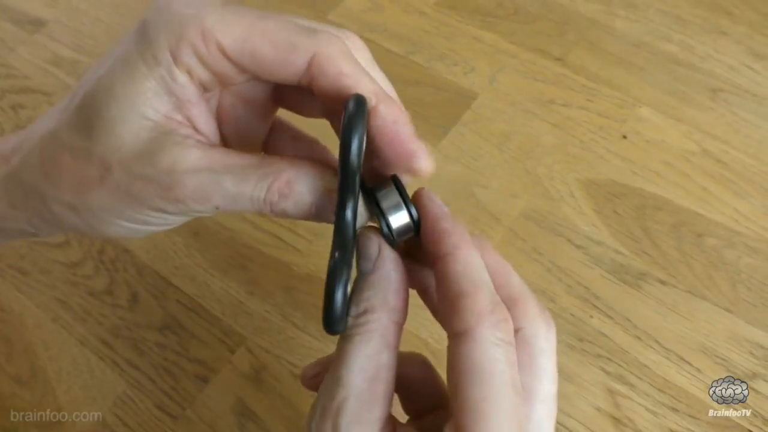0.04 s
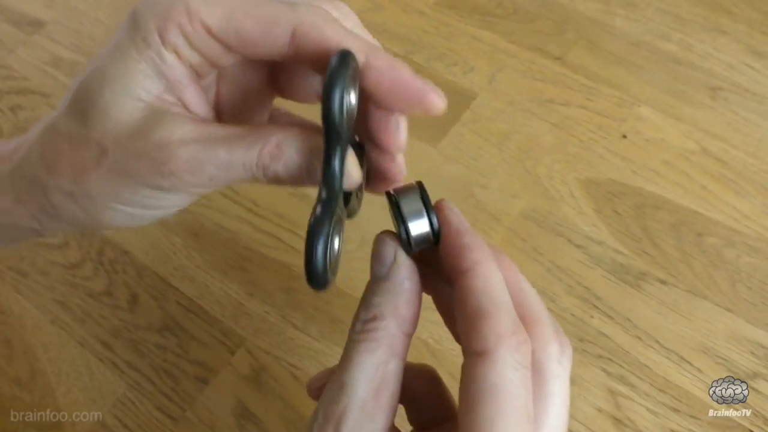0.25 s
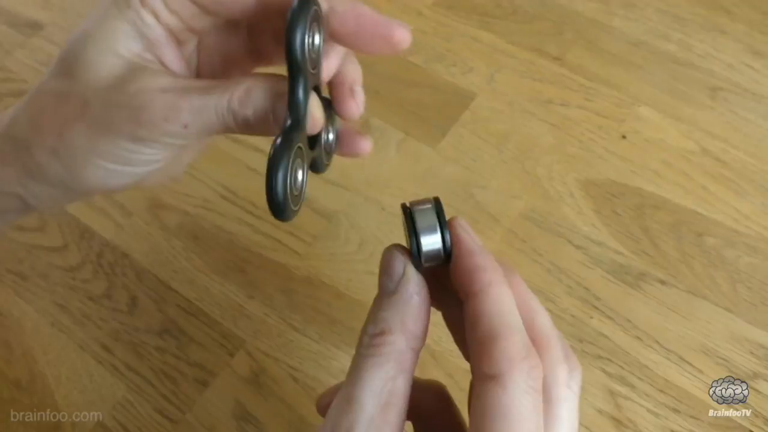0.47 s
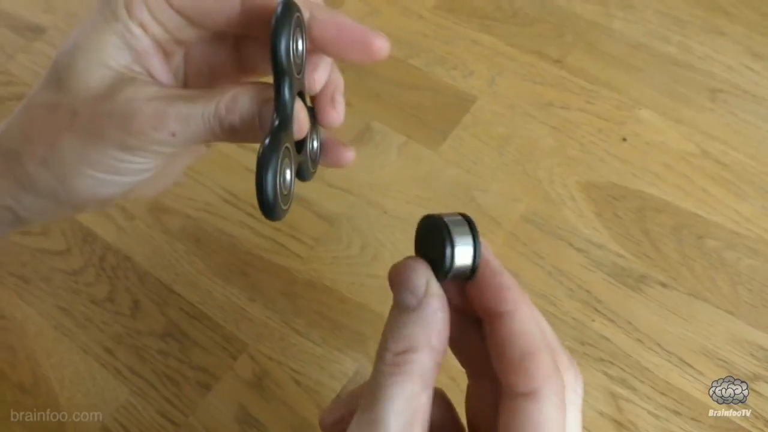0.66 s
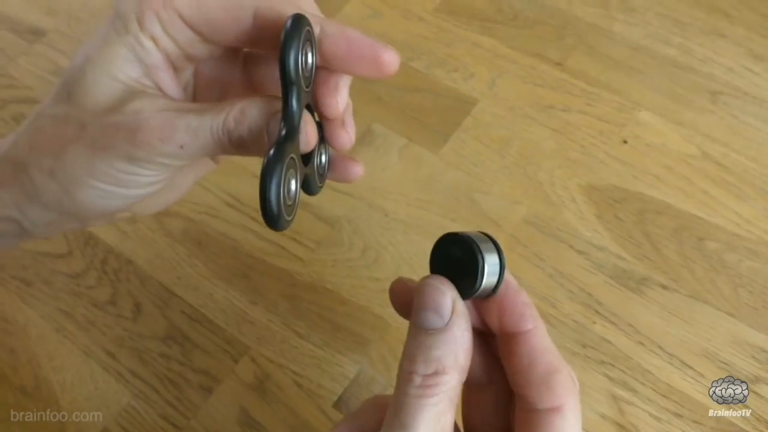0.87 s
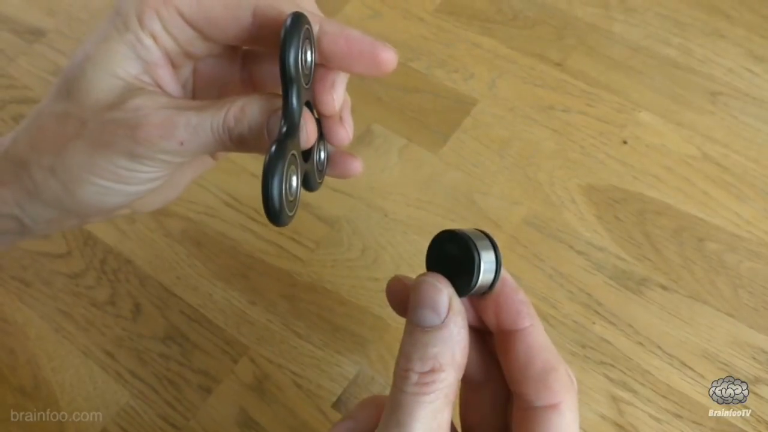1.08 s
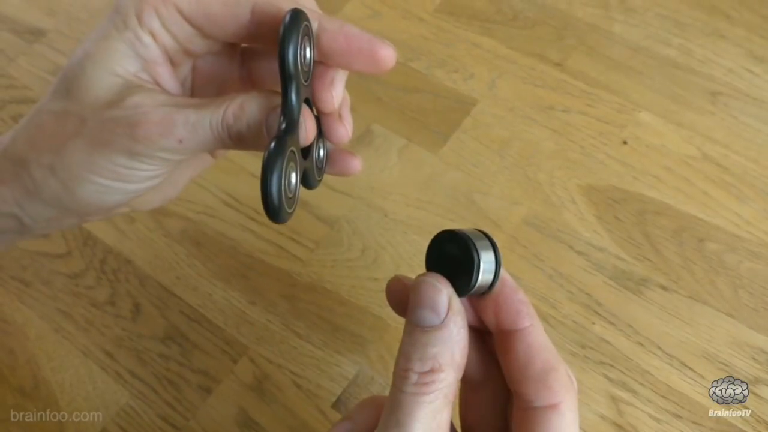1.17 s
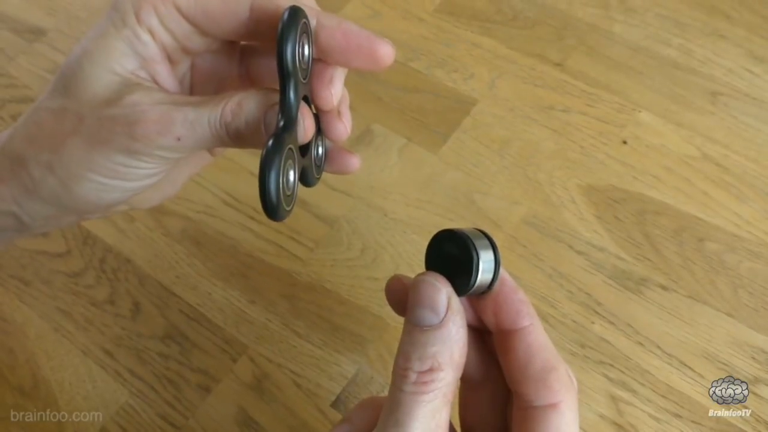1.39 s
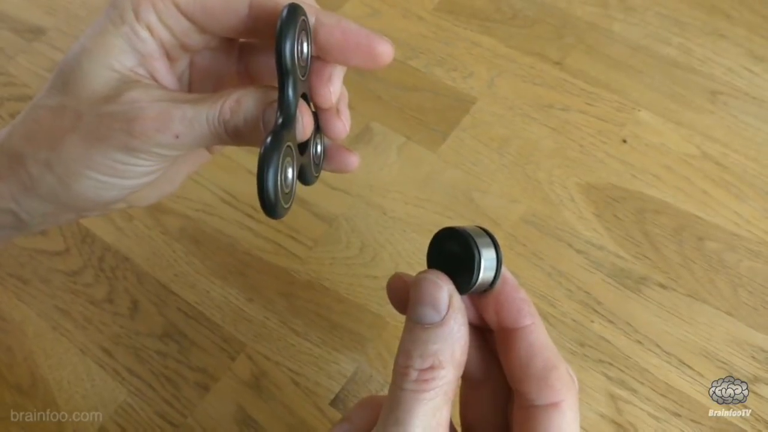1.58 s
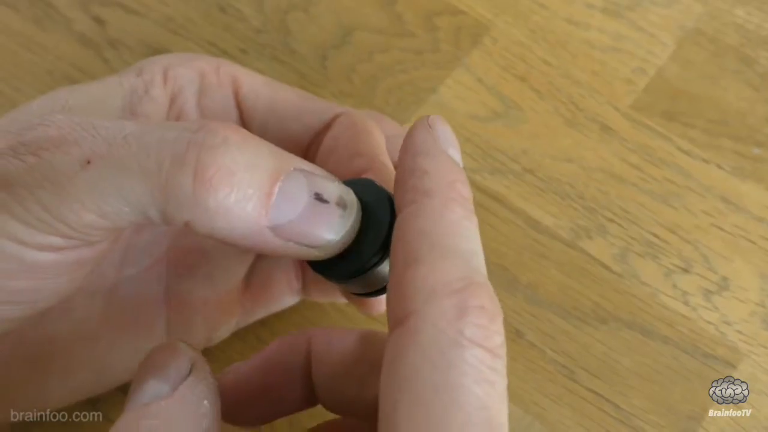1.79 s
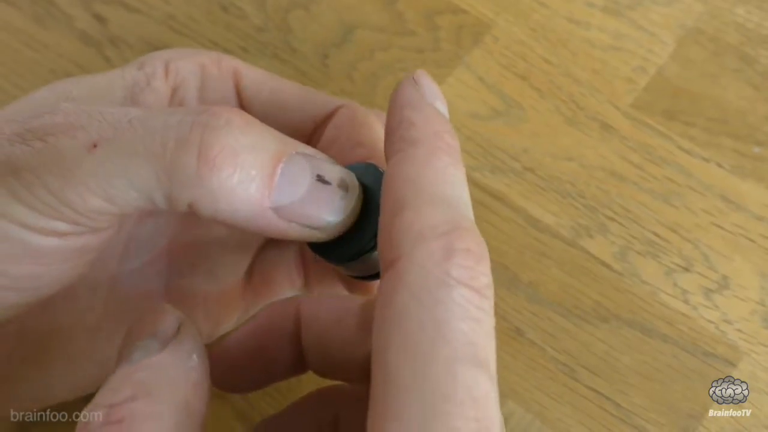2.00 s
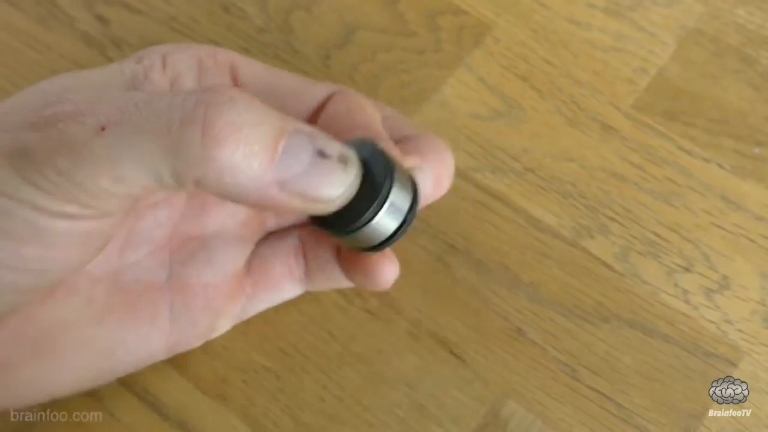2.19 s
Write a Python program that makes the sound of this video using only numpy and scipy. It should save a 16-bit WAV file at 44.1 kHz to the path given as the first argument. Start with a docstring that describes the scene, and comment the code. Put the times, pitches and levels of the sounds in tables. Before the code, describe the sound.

A small metal bearing whirrs close up, fine and bright with a slight rasp. At about 0.4 seconds it snaps free of a plastic spinner with a sharp click, whirrs a little fuller, and dies away around 1 second. A soft, low thump follows just after, then dry ticks near 1.4 seconds. Fingers rub with a faint hollow rustle throughout, over a quiet room's low hum and hiss.

```python
"""A small metal bearing whirrs between fingers, close up, snaps free of a plastic spinner and stops.
Its balls patter over the races so densely that they blur into a bright whirr with a coarser rasp.
The hands shift with a hollow rustle, skin slides on the caps and sometimes sings, and there are
a few dry ticks, faint bumps and one soft thump. Under it lie a low hum and the hiss of a quiet room."""
import sys
import numpy as np
from scipy import signal
from scipy.fft import rfft, irfft
from scipy.io import wavfile
from scipy.ndimage import uniform_filter1d

SR = 44100
rng = np.random.default_rng(int(sys.argv[2]) if len(sys.argv) > 2 else 0)


def int16_out(signal):
    """Quantize to a 16-bit WAV file."""
    q = np.round(np.clip(np.atleast_2d(signal).T, -1, 1) * 32767)
    wavfile.write(sys.argv[1], SR, q.astype(np.int16))


N = 99225
T = np.arange(N) / SR
SNAP_S = .4387  # the bearing comes free


def undb(db):
    """Decibels to gain."""
    return 10 ** (np.asarray(db) / 20)


def unit(x):
    """Scale to rms 1."""
    return x / np.sqrt(np.mean(x ** 2))


def curve(rows):
    """An envelope of straight lines through (t/s, value) points."""
    return np.interp(T, *np.array(rows).T)


def noise():
    """White noise."""
    return rng.standard_normal(N)


def colour(x, points):
    """EQ through (f/Hz, level/dB) points, falling steeply beyond the ends; rms 1."""
    log_f = np.log(np.fft.rfftfreq(N, 1 / SR) + 1)
    hz, db = np.array(points).T
    outside = np.abs(log_f - np.clip(log_f, np.log(hz[0]), np.log(hz[-1])))
    gain = undb(np.interp(log_f, np.log(hz), db) - 60 * outside)
    return unit(irfft(rfft(x) * gain, N))


def band(x, hz, width_hz):
    """Two equal resonant band-passes in series; rms 1."""
    f = np.fft.rfftfreq(N, 1 / SR) + 1
    return unit(irfft(rfft(x) / (1 + 1j * (f * f - hz * hz) / (f * width_hz * 1.52)) ** 2, N))


def flat_band(x, hz, width_hz):
    """A flat-topped band-pass with firm edges; rms 1."""
    f = np.fft.rfftfreq(N, 1 / SR)
    return unit(irfft(rfft(x) / np.sqrt(1 + (2 * (f - hz) / width_hz) ** 6), N))


def drift(rate_hz):
    """A smooth random modulator; rms 1."""
    span = int(SR / rate_hz)
    return unit(uniform_filter1d(uniform_filter1d(noise(), span, mode="wrap"), span, mode="wrap"))


def grains(per_s, spread_db):
    """Dense tiny impacts of uneven size."""
    impacts = noise() * (rng.random(N) < per_s / SR)
    return impacts * undb(spread_db * np.minimum(rng.exponential(size=N), 5))


def ping(start, hz, decay_s):
    """A struck, damped mode."""
    age = np.maximum(T - start, 0)
    return np.sin(2 * np.pi * hz * age) * np.exp(-age / decay_s)


def swell(middle, length):
    """A bell-shaped fade in and out."""
    return np.exp(-2 * ((T - middle) / length) ** 2)


def tone(hz, wander):
    """A sine of rms 1 whose pitch wanders by a fraction of itself."""
    pitch = hz * (1 + wander * drift(27.6))
    return np.sqrt(2) * np.sin(2 * np.pi * np.cumsum(pitch) / SR)


def grip_ripple(x, depth_db=2.2, width_hz=130, life_s=.07, size=1024):
    """Random narrow peaks and dips that change with the grip."""
    frames = dict(nperseg=size, noverlap=size * 3 // 4)
    spectra = signal.stft(x, **frames)[2]
    ripple = uniform_filter1d(rng.standard_normal(spectra.shape), int(width_hz * size / SR), axis=0)
    ripple = unit(uniform_filter1d(ripple, int(life_s * SR * 4 / size), axis=1))
    return signal.istft(spectra * unit(undb(depth_db * ripple)), **frames)[1][:N]


def bearing():
    """Balls patter over the races: a fine, resonant whirr, fuller once free, and a coarser rasp."""
    # EQ of the whirr pinched against the spinner, of the free whirr and of the rasp: f/Hz, level/dB
    pinched_eq = [(1500, -34), (3000, -11), (4000, -22), (4900, -11), (5500, -0.5), (6500, -4), (8000, 1),
                  (10500, 2), (13500, -5), (15500, -3.5), (17000, -19)]
    free_eq = [(900, -34), (2000, -17), (3600, -10), (4600, -6.5), (5600, 0.5), (6400, -3), (7500, 0.5),
               (10000, -0.5), (13000, -1), (15500, -2), (17000, -0.5)]
    rasp_eq = [(530, -40), (900, -14), (1180, -4), (1450, -9), (1760, -3.5), (2180, -9.5), (2350, -15),
               (2610, -7.5), (3290, -22), (4200, -13), (5460, -50), (9240, -120)]
    # resonances of the races, which come and go with the grip: f/Hz, width/Hz, level/dB
    races = [(2560, 60, -29), (9120, 140, -23), (11530, 60, -26), (12376, 60, -26), (13123, 60, -24),
             (13517, 60, -25), (14001, 60, -25), (16880, 200, -17)]
    # sheen and thin ring of the outer race, relative to the whirr: t/s, level/dB
    sheen_env = [(0, 0.5), (.4, -12.5), (.6, -8), (.73, -3), (.82, 0.5), (.88, 0), (.96, -0.5), (1.05, -14)]
    ring_env = [(0, -24), (.17, -22), (.28, -12), (.4, -21), (.7, -17), (.81, -13), (.91, -10), (1.0, -37)]
    # envelopes of the whirr (two parts: pinched, free) and of the rasp: t/s, level/dB
    whirr_env = [
        [(0.0, -55.5), (0.136, -51), (0.142, -48.5), (0.274, -50), (0.284, -49.5), (0.31, -50), (0.416, -47.5),
         (0.425, -44)],
        [(0.455, -45), (0.461, -42.5), (0.505, -46.5), (0.733, -44.5), (0.955, -45.5), (1.031, -59.5),
         (1.12, -65)],
    ]
    rasp_env = [(0, -80), (.2, -62), (.34, -65.5), (.40, -56.5), (.5, -50.5), (.57, -57), (.62, -54.5),
                (.66, -55.5), (.71, -50), (.8, -56.5), (.88, -59), (.96, -85), (1.1, -88)]
    patter = lambda: grains(per_s=14000, spread_db=-1)
    whirr = np.where(T < SNAP_S, colour(patter(), pinched_eq), colour(patter(), free_eq))
    whirr += undb(curve(sheen_env)) * band(patter(), hz=12600, width_hz=3000)
    for hz, width, db in races:
        whirr += undb(db + 3 * drift(8.8)) * band(patter(), hz, width)
    whirr += undb(curve(ring_env)) * band(patter(), hz=4470, width_hz=230)
    stop_s = whirr_env[1][-1][0]
    fade_out = np.clip((stop_s - T) / 0.11, 0, 1)
    whirr *= undb(curve(whirr_env[0] + whirr_env[1])) * fade_out
    rasp = colour(grains(per_s=3000, spread_db=1.9), rasp_eq) * undb(curve(rasp_env))
    flutter_db = 1.1
    return grip_ripple(whirr + rasp) * undb(flutter_db * drift(30))


def hand_rustle():
    """Fingers shift: friction grains in a hollow, gliding resonance, with a weaker one above it."""
    # centre of the hollow resonance: t/s, f/Hz
    glide = [(0, 596.7), (.2, 642.4), (.5, 671.3), (.88, 611.8), (1.05, 680), (1.35, 668.7), (1.6, 615),
             (1.7, 635.7), (1.82, 700), (2.0, 670), (2.2, 700)]
    # EQ of the broad rustle around it: f/Hz, level/dB
    skirt_eq = [(150, -14.5), (260, 8.5), (430, -1.5), (560, 5), (760, 4), (930, -6), (1200, -14.5),
                (1600, -11), (2400, -40), (5000, -99)]
    # envelopes of the hollow rustle (two parts in a row) and of the upper resonance: t/s, level/dB
    hollow_env = [
        [(0.0, -66), (0.066, -49.5), (0.172, -57.5), (0.21, -52.5), (0.256, -74), (0.286, -50), (0.318, -74),
         (0.344, -56.5), (0.4, -58.5), (0.438, -44.5), (0.484, -63), (0.812, -53.5), (0.83, -48),
         (0.924, -45.5), (0.95, -50), (1.05, -52.5)],
        [(1.06, -57), (1.092, -46), (1.42, -51.5), (1.46, -63), (1.52, -71), (1.54, -57), (1.576, -69),
         (1.626, -47.5), (1.65, -61), (1.682, -51), (1.698, -49.5), (1.998, -50), (2.03, -83), (2.054, -59),
         (2.116, -54.5), (2.25, -67)],
    ]
    upper_env = [(0, -54.5), (.07, -61.5), (.17, -56), (.35, -58), (.55, -71.5), (.8, -55), (1, -60),
                 (1.4, -71), (2.25, -68.5)]
    centre = curve(glide)
    core = band(grains(per_s=2500, spread_db=1.36), centre.mean(), width_hz=55)
    shift = np.exp(2j * np.pi * np.cumsum(centre - centre.mean()) / SR)
    core = (signal.hilbert(core) * shift).real  # frequency-shifted along the glide
    skirt = colour(grains(per_s=1500, spread_db=2.34), skirt_eq)
    hollow = (undb(-3) * core + undb(-4) * skirt) * undb(curve(hollow_env[0] + hollow_env[1]))
    upper = band(noise(), hz=1150.4, width_hz=113) * undb(curve(upper_env))
    return hollow + upper


def room():
    """The quiet bed: a wavering two-note hum, steady mains lines, room tone and hiss."""
    # envelopes of the low and high hum notes and of the hiss: t/s, level/dB
    low_env = [(0, -72), (.33, -63), (.42, -68), (.47, -52), (.52, -46), (.575, -59), (.62, -52),
               (.73, -70), (.83, -64), (.91, -45), (.99, -60), (1.07, -70), (1.3, -66), (2.25, -70)]
    high_env = [(0, -72.5), (.45, -66.5), (.53, -56), (.6, -63), (.66, -50), (.7, -58), (.75, -53),
                (.82, -60), (.9, -56.5), (.99, -50.5), (1.06, -73), (1.25, -57), (1.38, -67.5), (1.5, -56),
                (1.7, -64), (2, -62), (2.25, -83)]
    hiss_env = [(0, -62), (1.1, -61.5), (1.5, -63), (1.75, -60.5), (2, -59), (2.25, -58.5)]
    # mains lines: f/Hz, level/dB
    mains_lines = [(120, -82), (600, -65)]
    # EQ of the room tone and of the hiss: f/Hz, level/dB
    room_eq = [(40, -9), (80, -6.5), (200, 0), (450, -6.5), (650, -4.5), (950, -1.5), (1500, -4),
               (2500, -10), (4000, -70)]
    hiss_eq = [(1470, -37), (2500, -4), (3060, -2), (3260, -5), (3640, -4.5), (4110, -7), (4310, -0.5),
               (5710, -5), (6650, -3.5), (8530, -4.5), (11700, -1), (15400, -6.5), (17000, -4.5)]
    waver = lambda hz: tone(hz, wander=.04) + undb(-8) * band(noise(), hz, hz / 3)
    hum = waver(hz=116) * undb(curve(low_env)) + waver(hz=199.3) * undb(curve(high_env) + 1.5)
    for hz, db in mains_lines:
        hum += undb(db) * np.sqrt(2) * np.sin(2 * np.pi * (hz * T + rng.random()))
    room_tone = undb(-63.5) * colour(noise(), room_eq)
    hiss = undb(curve(hiss_env)) * colour(noise(), hiss_eq)
    return hum + room_tone + hiss


def hand_bumps():
    """Soft knocks of the hands, each a few low cycles with a dull rumble; one stands out as a thump."""
    # knocks: t/s, level/dB, f/Hz, hold/s
    knocks = [(0.049, -51.5, 81, 0.026), (.085, -52, 171, .005), (0.134, -57, 80, 0.034),
              (0.277, -57.5, 97, 0.027), (0.366, -64, 75, 0.023), (.44, -48.5, 72, 0.015),
              (.495, -53, 83, 0.012), (0.59, -59, 82, 0.035), (0.874, -57, 86, 0.085),
              (1.141, -25.5, 64, 0.033), (1.223, -48, 80, 0.0084), (1.791, -62.5, 82, 0.037),
              (1.938, -53.5, 71.4, 0.029)]
    # EQ of the rumble: f/Hz, level/dB
    rumble_eq = [(20, 20), (40, -9), (110, 8), (170, 2), (300, -12.5), (700, -18), (2000, -45)]
    attack_s, release_s = 0.001, 0.019
    out = np.zeros(N)
    for start, db, hz, hold in knocks:
        age = np.maximum(T - start, 0)
        envelope = np.minimum(age / attack_s, 1) * np.exp(-np.maximum(age - hold, 0) / release_s)
        rumble = undb(-10) * colour(noise(), rumble_eq)
        out += undb(db) * envelope * (rumble - np.sin(2 * np.pi * hz * age))
    return out


def skin_rubs():
    """Skin slides on the caps in swells of friction grains; at times the hollow resonance sings."""
    # slides: middle t/s, length/s, level/dB, centre f/Hz, width/Hz
    slides = [(0.296, 0.059, -57, 442, 695), (0.396, 0.074, -57, 7150, 5470),
              (0.624, 0.023, -54.5, 455, 700), (0.612, 0.028, -50.5, 5000, 7000),
              (0.7, 0.052, -51, 5000, 6960), (.66, .07, -51, 16000, 2200), (0.747, 0.11, -56, 376, 300),
              (1.149, 0.027, -44.5, 990, 1260), (1.157, 0.027, -59.5, 2340, 1310),
              (1.17, .035, -47.5, 238, 179), (1.207, 0.17, -55, 1140, 910),
              (1.262, 0.044, -54.5, 1800, 347), (1.277, 0.09, -62.5, 2640, 600),
              (1.317, 0.068, -55, 7200, 4400), (1.359, 0.02, -49.5, 11300, 4500),
              (1.375, 0.069, -55, 6800, 5200), (1.554, 0.023, -51.5, 490, 490),
              (1.607, 0.23, -58, 393, 380), (1.737, 0.055, -59.5, 1480, 296),
              (1.856, 0.1, -58.5, 1530, 550), (1.857, 0.019, -51, 304, 196), (1.863, 0.15, -65, 5100, 4540),
              (1.942, 0.06, -55, 230, 178), (1.96, 0.04, -60.5, 8750, 1700), (2.058, 0.1, -55.5, 1465, 520),
              (2.08, .06, -64, 2680, 700), (2.139, 0.027, -58.5, 8600, 1700)]
    # sung notes: middle t/s, length/s, level/dB, f/Hz
    notes = [(0.078, 0.034, -51.5, 602), (0.356, 0.068, -55, 654), (0.56, 0.19, -57.5, 662),
             (0.867, 0.084, -49, 615), (0.919, 0.023, -41.5, 612), (1.092, 0.011, -43.5, 644),
             (1.12, 0.047, -49.5, 608), (1.408, 0.03, -58, 607), (1.679, 0.019, -43, 625),
             (1.743, 0.057, -54, 631)]
    friction = np.zeros(N)
    for middle, length, db, hz, width in slides:
        texture = flat_band(grains(per_s=6000, spread_db=0.84), hz, width)
        friction += undb(db) * swell(middle, length) * texture
    out = grip_ripple(friction)
    for middle, length, db, hz in notes:
        out += undb(db) * swell(middle, length) * tone(hz, wander=0.01216)
    return out


def clicks():
    """Hard, dry contacts, each a bright tick over a short body; the loudest is the crack of the snap."""
    # contacts: t/s, level/dB, tick f/Hz, tick decay/s, relative body level/dB
    contacts = [(.2852, -31, 13500, .0001, -18), (.4367, -29, 9500, .00013, -30),
                (.4383, -8, 9800, .0001, -33), (.7156, -29, 13000, .0002, -25),
                (.756, -30, 12500, .0002, -25), (.792, -29, 12500, .0004, -30),
                (1.3541, -32, 11000, .00015, -22), (1.3555, -35, 11500, .0003, -26),
                (1.3610, -36, 11000, .00015, -22), (1.3620, -25, 11000, .00012, -13)]
    out = np.zeros(N)
    for start, db, hz, decay, body_db in contacts:
        tick = 2 * ping(start, hz, decay)
        body = undb(body_db) * ping(start, hz=1670, decay_s=0.0011)
        out += undb(db) * (tick + body)
    return out


def snap_tail():
    """The bearing comes free with a small pressure pulse and rings faintly."""
    # modes of the bearing: f/Hz, level/dB, t60/s
    modes = [(1830, -58, .2), (2560, -49.5, .38), (4517, -60, .2)]
    rise_s = 0.00073
    progress = np.maximum(T - SNAP_S, 0) / rise_s
    pulse = undb(-41.5) * progress * np.exp(1 - progress)
    ring = sum(undb(db) * ping(SNAP_S, hz, t60 / np.log(1000)) for hz, db, t60 in modes)
    return pulse + ring


def scene():
    """All layers in mono at one close microphone."""
    mix = bearing() + hand_rustle() + skin_rubs() + clicks() + snap_tail() + hand_bumps() + room()
    return mix[None]


def record(dry):
    """The recorder trims the deepest bass and cuts the top steeply."""
    low_cut_hz, high_cut_hz = 30, 17200
    dry = signal.sosfilt(signal.butter(2, low_cut_hz, "high", fs=SR, output="sos"), dry)
    return signal.sosfilt(signal.ellip(8, .2, 70, high_cut_hz, fs=SR, output="sos"), dry)


dry = scene()
out = record(dry)
int16_out(out)
```